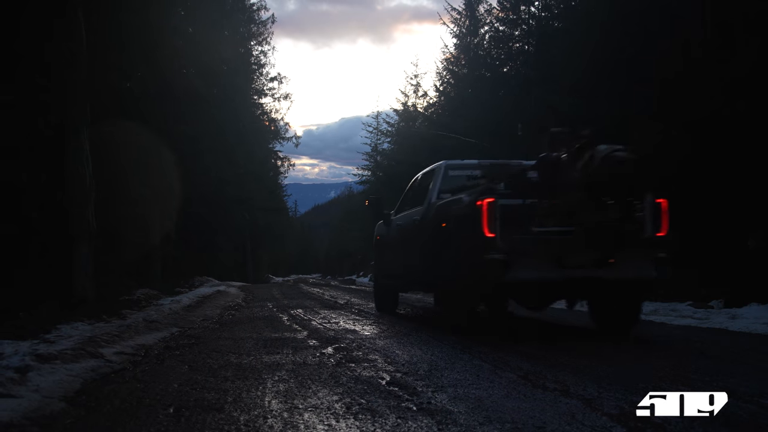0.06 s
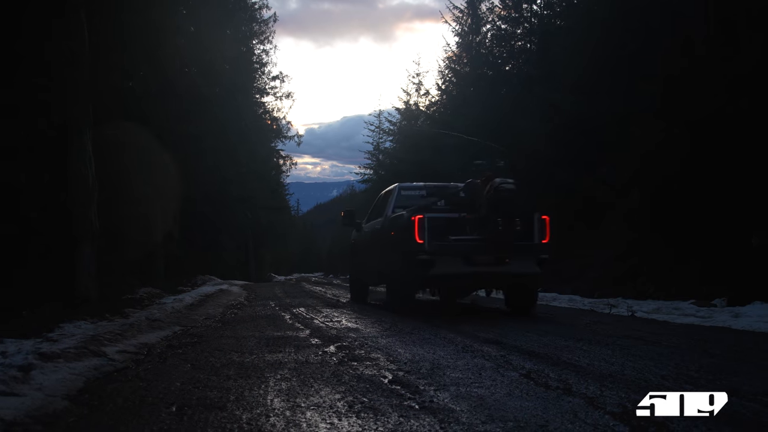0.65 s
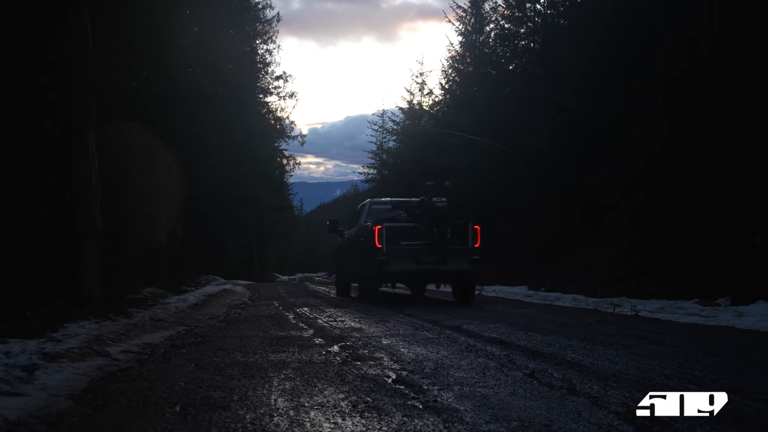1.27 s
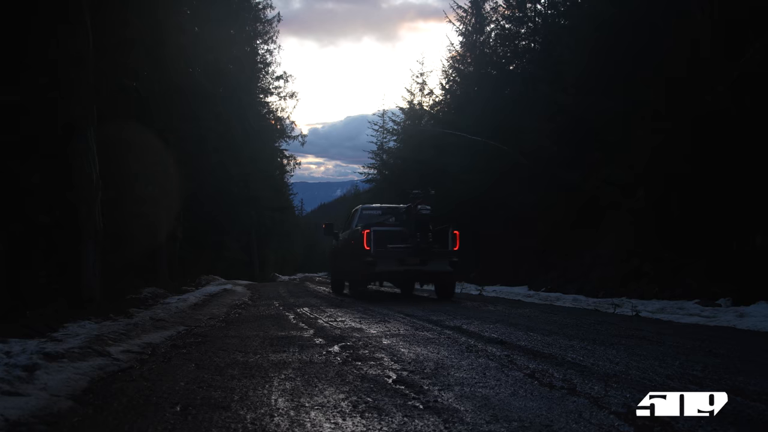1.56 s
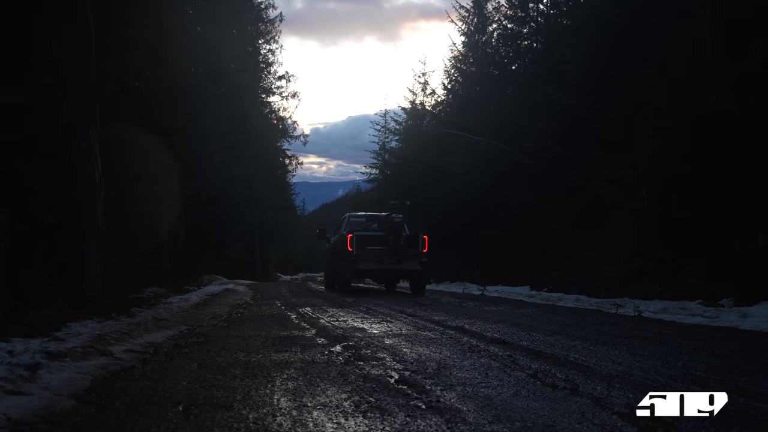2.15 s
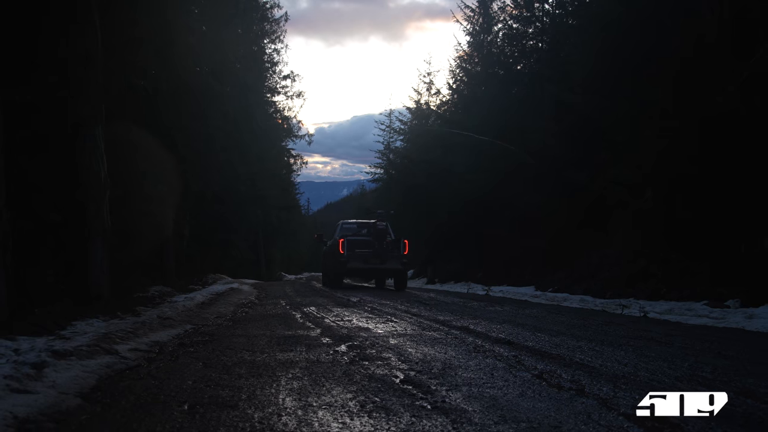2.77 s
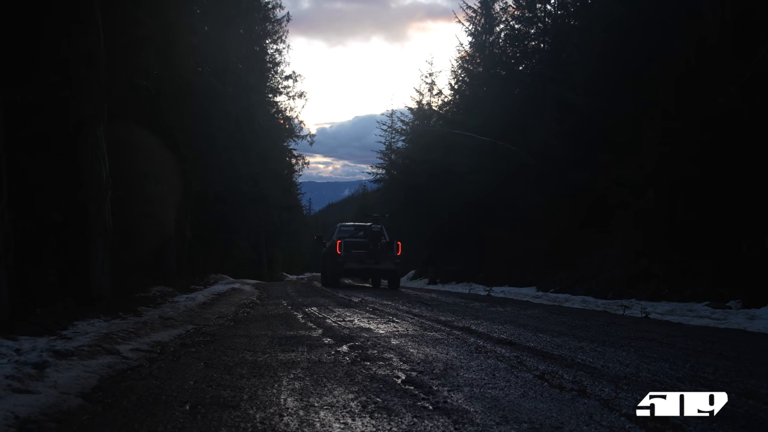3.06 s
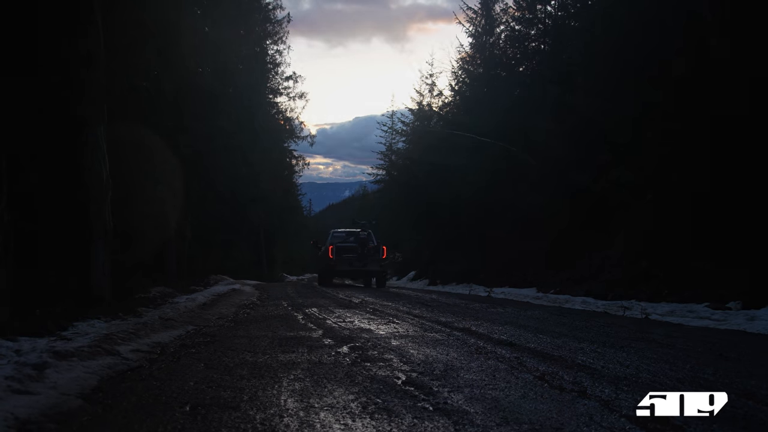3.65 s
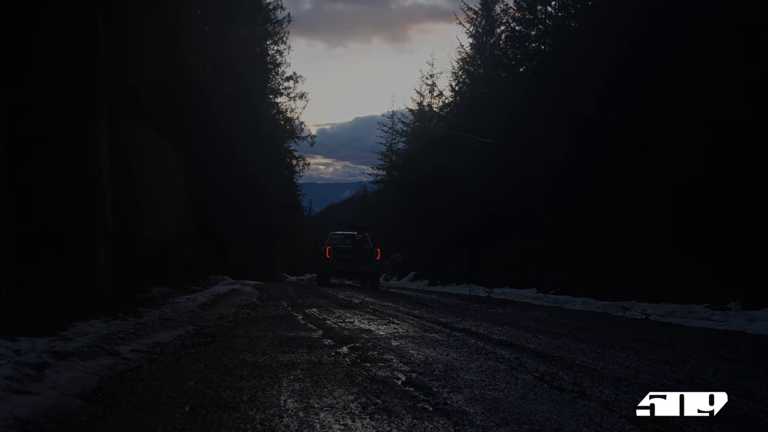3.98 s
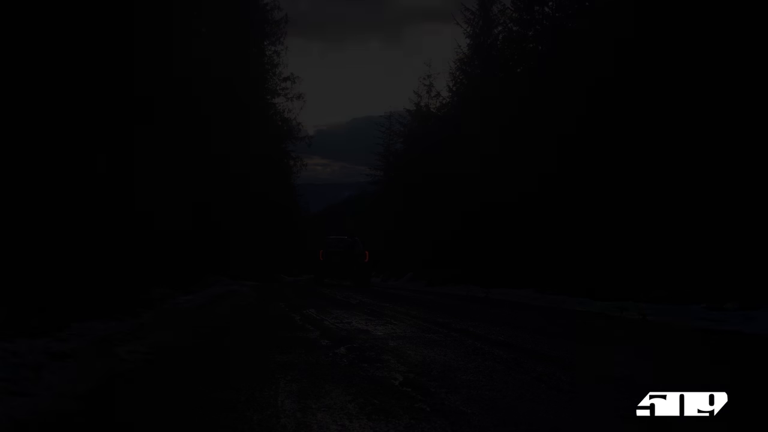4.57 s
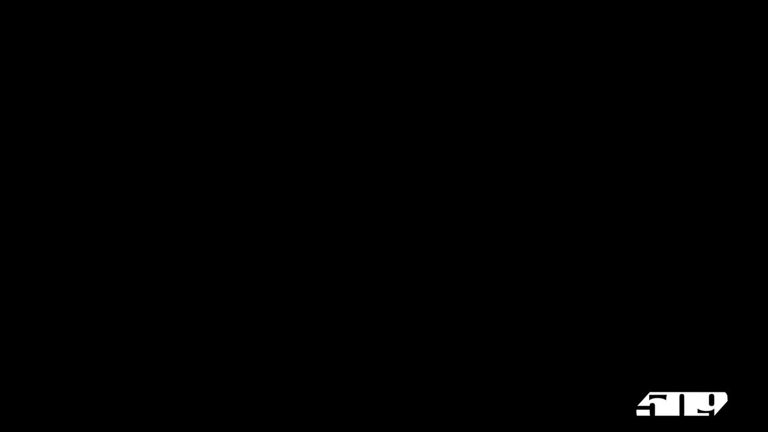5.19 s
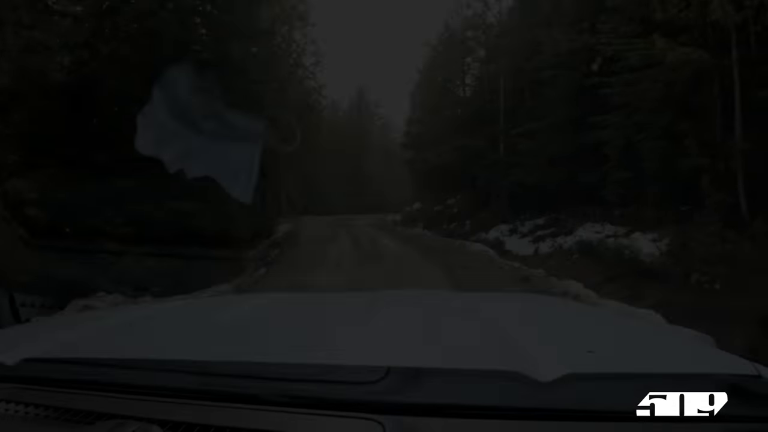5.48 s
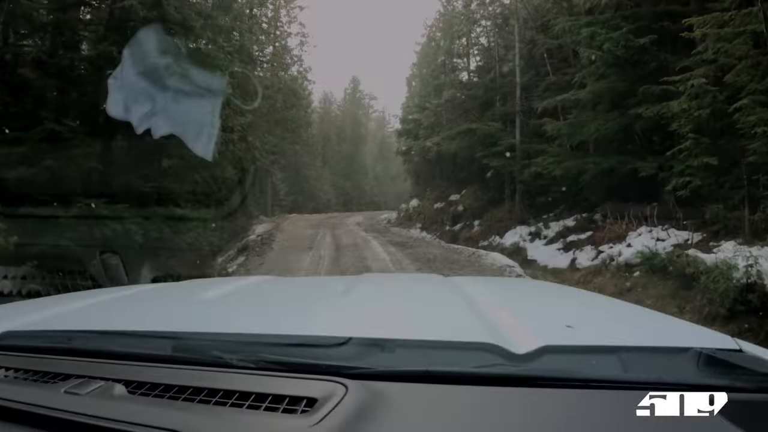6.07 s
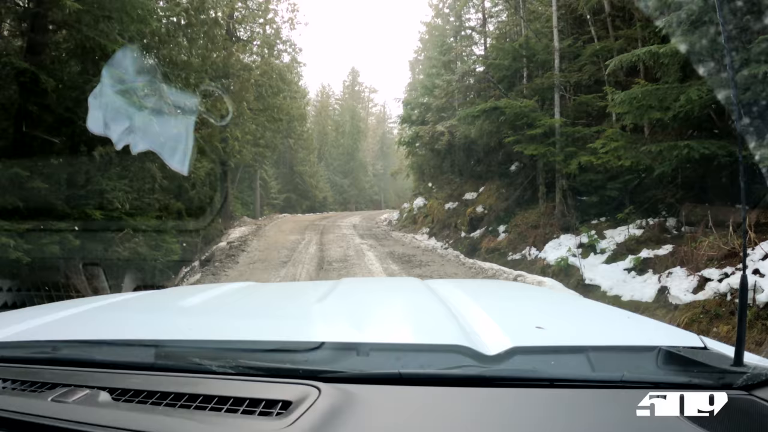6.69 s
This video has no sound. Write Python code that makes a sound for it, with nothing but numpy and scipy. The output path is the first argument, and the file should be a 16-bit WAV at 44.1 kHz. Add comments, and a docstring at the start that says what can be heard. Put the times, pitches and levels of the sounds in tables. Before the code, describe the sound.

Heard from the edge of a wet forest road, truck tyres crackle over grit and fling hissing spray, with snapping stones, a few pothole knocks and a barely audible engine hum. The truck grows distant and everything fades out. After a moment of silence the microphone is inside the moving cab, where a heavy low rumble and repeated bumps dominate, while loose trim chatters softly and gravel hisses under the floor.

```python
"""Pickup on wet gravel

A pickup drives away: its tyres crunch grit, fling spray, pop stones and thump through holes
over a faint exhaust drone. That fades to silence, and the ride fades in from inside the cab:
the body booms, the road rumbles through the suspension, gravel hisses under the floor, trim rattles."""
import sys
import numpy as np
from scipy import signal
from scipy.fft import rfft, irfft, next_fast_len
from scipy.io import wavfile
from scipy.ndimage import map_coordinates

SR = 44100
rng = np.random.default_rng(int(sys.argv[2]) if len(sys.argv) > 2 else 0)


def master(y):
    """Save y as 16-bit WAV."""
    cut = np.clip(np.atleast_2d(y).T, -1, 1)
    pcm = np.round(cut * 32767)  # scale
    wavfile.write(sys.argv[1], SR, pcm.astype(np.int16))


N = 301198
T = np.arange(N) / SR
SIDES = np.array([[.5], [-.5]])  # splits a left-right difference


def amp(db):
    """Decibels to gain."""
    return 10 ** (np.asarray(db) / 20)


def unit(x):
    """Scale to rms 1."""
    return x / np.sqrt(np.mean(x ** 2) + 1e-20)


def along(points, hz):
    """(f/Hz, value) points read on a log axis."""
    freqs, values = np.transpose(points)
    return np.interp(np.log(hz + 1), np.log(freqs), values)


def curves(rows):
    """One value per sample for each column after the time."""
    times, *columns = np.transpose(rows)
    return [np.interp(T, times, column) for column in columns]


def wobble(rate_hz):
    """Smooth random curve, rate_hz knots a second."""
    return map_coordinates(rng.standard_normal(int(N * rate_hz / SR) + 4), [T * rate_hz])


def swell(at_s, half_s):
    """Gaussian rise and fall."""
    return np.exp(-.5 * ((T - at_s) / half_s) ** 2)


def bursts(rows, attack_s, decay_s):
    """Envelope of brief flurries: quick rise, exponential decay."""
    return sum(amp(db) * np.clip((T - s) / attack_s, 0, 1) * np.exp(-np.abs(T - s - attack_s) / decay_s)
               for s, db, *_ in rows)


def filtered(x, response):
    """Apply a frequency response."""
    size = next_fast_len(N + SR // 2)
    return irfft(rfft(x, size) * response(np.fft.rfftfreq(size, 1 / SR)), size)[..., :N]


def coloured(x, spectrum):
    """Minimum-phase filter with 36 dB/octave skirts; output at rms 1."""
    size = 2 * next_fast_len(N)
    hz = np.fft.rfftfreq(size, 1 / SR) + 1
    octaves_out = np.abs(np.log2(hz / np.clip(hz, spectrum[0][0], spectrum[-1][0])))
    db = np.maximum(along(spectrum, hz) - 36 * octaves_out, -120)
    cepstrum = irfft(np.log(amp(db)))
    cepstrum[1:size // 2] *= 2
    cepstrum[size // 2 + 1:] = 0
    return unit(irfft(rfft(x, size) * np.exp(rfft(cepstrum)))[..., :N])


def spread(pair, coherence):
    """Two unrelated signals, as mid and side, to left and right of given coherence."""
    def weights(hz):
        angle = np.arccos(np.clip(along(coherence, hz), -1, 1)) / 2
        return np.array([np.cos(angle), np.sin(angle)])
    mid, side = filtered(pair, weights)
    return np.array([mid + side, mid - side])


def tone(hz):
    """Sine of varying frequency, rms 1."""
    return unit(np.sin(2 * np.pi * np.cumsum(hz) / SR))


def ring(hz, cycles, t):
    """Resonance, 60 dB down after the given cycles."""
    return np.sin(2 * np.pi * hz * t) * np.exp(-np.log(1000) * hz * t / cycles)


def add(track, at_s, sound):
    """Mix a sound into a track."""
    part = track[..., round(at_s * SR):][..., :sound.shape[-1]]
    part += sound[..., :part.shape[-1]]


def grit(rate_hz, scatter_db, wash_db):
    """Two streams of tiny impacts of scattered size on a wash of noise."""
    hits = rng.random((2, N)) < rate_hz / SR
    sizes = amp(scatter_db * np.minimum(rng.standard_normal((2, N)), 2))
    signs = rng.choice([-1, 1], (2, N))
    return unit(unit(hits * sizes * signs) + amp(wash_db) * rng.standard_normal((2, N)))


def clumps(rate_hz, decay_s, share):
    """Clods give way and crumble: overlapping decays as a gain of rms 1."""
    t = np.arange(SR // 10) / SR
    starts = (rng.random(N) < rate_hz / SR) * rng.uniform(0.4, 1, N)
    power = np.abs(signal.fftconvolve(starts, np.exp(-t / decay_s))[:N])
    return np.sqrt(1 - share + share * power / power.mean())


def suspension(rows, cycles):
    """Each bump rings a low body mode; rubber mounts soften the blow."""
    thumps, t = np.zeros(N), np.arange(SR // 3) / SR
    for s, db, hz in rows:
        onset = 1 - np.exp(-(hz * t) ** 2)
        add(thumps, s, amp(db) * ring(hz, cycles, t) * onset)
    return thumps


START_M, SPEED_M_PER_S = 10.17, 5.04
TRAVEL_M = SPEED_M_PER_S * T
DISTANCE_DOUBLINGS = np.log2(1 + TRAVEL_M / START_M)

# firing note: t/s, f/Hz, level/dB
FIRING_NOTE = [(0, 86, -49.5), (1, 86, -57), (1.9, 104, -61), (2.7, 92, -61), (3.5, 88, -57.5),
               (4.0, 88, -53.5), (4.4, 89.2, -63)]


def exhaust():
    """Faint, unsteady tailpipe drone."""
    firing_hz, db = curves(FIRING_NOTE)
    return amp(db + 1.8 * wobble(6.7)) * tone(firing_hz + 1.54 * wobble(15))


# flurries of trim and of grit: t/s, level/dB
TRIM_BURSTS = [(5.436, -46), (5.496, -44), (5.561, -45.5), (5.62, -48), (5.676, -50), (5.738, -48.5),
               (5.903, -52), (6.007, -53), (6.123, -50), (6.158, -48), (6.186, -45), (6.228, -52),
               (6.346, -51), (6.668, -53), (6.742, -52)]
SPATTER_BURSTS = [(5.743, -57), (5.78, -59), (5.986, -55), (6.027, -57), (6.221, -54), (6.29, -57),
                  (6.475, -56), (6.627, -55), (6.707, -56), (6.79, -51)]
# their spectra: f/Hz, level/dB
TRIM_SPECTRUM = [(1000, 1), (1300, 3), (1700, -1), (2250, -3), (2900, -9.5), (3700, -17.5), (5500, -27)]
SPATTER_SPECTRUM = [(2000, -1), (4000, 4.5), (7000, -6.5), (12000, -17)]


def rattles():
    """Loose trim chatters; flung grit spatters brightly against the body."""
    chatter = coloured(grit(rate_hz=810, scatter_db=8.5, wash_db=-2), TRIM_SPECTRUM)
    spatter = coloured(grit(rate_hz=1500, scatter_db=5, wash_db=-5.5), SPATTER_SPECTRUM)
    return (chatter * bursts(TRIM_BURSTS, attack_s=.005, decay_s=.014)
            + spatter * bursts(SPATTER_BURSTS, attack_s=.004, decay_s=.01))


# body heaves: t/s, level/dB
BODY_HEAVES = [(5.39, -20), (5.52, -27.5), (5.79, -21.5), (5.91, -19.5), (5.951, -14.5), (6.08, -20),
               (6.21, -16.5), (6.28, -14.5), (6.42, -18.5), (6.53, -18), (6.61, -18.5), (6.71, -12),
               (6.81, -10.5)]


def boom(mode_hz=33.1, drift_hz=4.23):
    """Each heave swells the cab's lowest air resonance."""
    power = sum((amp(db) * swell(s, half_s=0.047)) ** 2 for s, db in BODY_HEAVES)
    return np.sqrt(power) * tone(mode_hz + drift_hz * wobble(11))


# rough stretches: t/s, half-length/s, shake/dB, grit/dB
ROUGH_STRETCHES = [(5.397, .025, 0, 2), (5.456, 0.027, 4, 2), (5.597, 0.057, 3.5, -3.5),
                   (5.76, 0.024, 0, -1.5), (5.932, 0.03, -0.5, 1), (6.153, 0.044, 2.5, 4),
                   (6.3, 0.03, 1, 4), (6.426, 0.066, 0, -1), (6.668, 0.096, -2, 0.5), (6.77, 0.022, 3.5, 4),
                   (6.822, 0.024, 0, 10)]
# spectra in the cab: f/Hz, level/dB
RUMBLE_SPECTRUM = [(18, -2), (32, -9.5), (45, -4.5), (57, 0), (72, -9.5), (86, -12.5), (100, -8.5),
                   (128, -13), (175, -16), (210, -23.5)]
ROAR_SPECTRUM = [(170, -15.5), (220, -4), (285, 0), (345, -13.5), (395, -6), (460, -16), (560, -13),
                 (720, -21), (1000, -23), (1250, -32)]
GRAVEL_SPECTRUM = [(1000, -14.5), (1400, -3.5), (2050, -6.5), (2700, -8.5), (4000, -12), (5200, -16.5),
                   (7000, -21.5), (10000, -30), (15000, -38)]


def road_noise():
    """The road shakes the cab's air; gravel hisses faintly through the floor."""
    shake_db, grit_db = sum(np.outer(dbs, swell(s, half_s)) for s, half_s, *dbs in ROUGH_STRETCHES)
    rumble = amp(-20.5 + shake_db) * coloured(rng.standard_normal((2, N)), RUMBLE_SPECTRUM)
    roar_gain = amp(-36.5 + 1.3 * shake_db + wobble(30))
    roar = coloured(grit(rate_hz=550, scatter_db=2, wash_db=2.5), ROAR_SPECTRUM)
    gravel_gain = amp(-58.5 + grit_db) * clumps(rate_hz=110, decay_s=0.013, share=0.62)
    gravel = coloured(grit(rate_hz=540, scatter_db=1.5, wash_db=6.5), GRAVEL_SPECTRUM)
    return rumble + roar_gain * roar + gravel_gain * gravel


# bumps through the suspension: t/s, level/dB, f/Hz
CAB_BUMPS = [(5.47, -18, 90), (5.598, -17, 110), (5.62, -16, 62), (5.744, -21, 225), (5.775, -18, 105),
             (5.847, -24, 255), (6.028, -12, 155), (6.035, -13, 64), (6.11, -9, 70), (6.152, -8.5, 108),
             (6.156, -20, 280), (6.16, -26, 480), (6.29, -27, 520), (6.362, -11.5, 130), (6.39, -13.5, 62),
             (6.466, -26, 570), (6.496, -23, 230), (6.61, -15, 57), (6.744, -7.5, 64), (6.777, -26, 290)]
# left-right likeness: f/Hz, coherence
CAB_COHERENCE = [(60, 1.0), (130, 1), (290, 0.97), (640, 0.94), (1410, 0.8), (3100, 0.6), (6820, 0.13),
                 (15000, 0.15)]


def cab():
    """The ride from inside, slightly louder on the left."""
    diffuse = spread(road_noise() + rattles(), CAB_COHERENCE)
    return (diffuse + boom() + suspension(CAB_BUMPS, cycles=21.6)) * amp(1.3 * SIDES)


# wheel drops: t/s, level/dB, f/Hz
POTHOLES = [(1.094, -21, 310), (1.116, -20, 170), (1.133, -22, 105), (1.47, -28, 290), (1.9, -26, 170),
            (2.378, -28, 140), (2.403, -26.5, 200), (3.245, -31, 260), (3.77, -34, 330), (3.985, -32, 230),
            (4.435, -29, 250), (4.59, -30, 280)]
# knock and rolling spectra: f/Hz, level/dB
AXLE_SPECTRUM = [(35, -7), (150, -7), (280, 0), (480, -1), (620, -11)]
ROLL_SPECTRUM = [(30, -31.5), (50, -7), (68, -6.5), (100, -1), (165, -2.5), (188, -6.5), (220, -1),
                 (290, -4), (360, -6.5), (520, -7.5), (750, -18)]


def chassis():
    """Rolling rumble, less on smoother ground; in holes the body thumps and the axle knocks."""
    smooth_ground = np.clip((T - 2.15) / 0.3, 0, 1)
    roll_db = -39 - 2 * DISTANCE_DOUBLINGS - 5.5 * smooth_ground + 1.4 * wobble(25)
    knock_gain = amp(-15.5) * bursts(POTHOLES, attack_s=.008, decay_s=.028)
    knocks = knock_gain * coloured(rng.standard_normal(N), AXLE_SPECTRUM)
    roll = amp(roll_db) * coloured(rng.standard_normal(N), ROLL_SPECTRUM)
    return roll + suspension(POTHOLES, cycles=13) + knocks


# stone pops: t/s, relative level/dB, f/Hz
STONE_POPS = [(0.226, -17, 1130), (0.256, -14, 1000), (0.304, -17, 1140), (0.435, -10, 1230),
              (0.506, -15, 1680), (0.551, -17, 1060), (0.624, -17, 2300), (0.692, -18, 1530),
              (0.9, -18, 900), (0.954, -17, 3700), (0.961, -14.5, 2100), (0.975, -14, 888),
              (1.0, -12, 2200), (1.228, -15, 1030), (1.294, -16, 1630), (1.596, -19, 1140),
              (1.702, -15, 1170), (1.958, -19, 1270), (2.233, -17, 2120), (2.283, -19, 1020),
              (2.364, -20, 2340), (2.52, -21, 1100), (2.691, -19, 1060), (2.848, -21, 800),
              (3.197, -16, 1540), (3.25, -22, 1280), (3.329, -23, 1020), (3.405, -22, 899),
              (3.574, -22, 2160), (3.815, -24, 1750), (4.059, -18.5, 1210), (4.133, -24, 2250),
              (4.174, -24, 2100), (4.264, -25, 1100), (4.377, -24, 1100)]


def stones(gain_db=4.5, cycles=7, debris_t60_s=.032, low_hz=680, high_hz=5000):
    """Stones snap from under the tread, ring, rebound and trail a wide patter of debris."""
    pops, t = np.zeros((2, N)), np.arange(SR // 8) / SR
    mid = pops[0]
    for s, db, hz in STONE_POPS:
        debris = amp(db - 15 - 60 * t / debris_t60_s) * rng.standard_normal((2, len(t)))
        add(pops, s, debris)
        add(mid, s, amp(db) * ring(hz, cycles, t))
        rebound_s = s + rng.uniform(0.0016, 0.003)
        add(mid, rebound_s, amp(db - 9) * ring(hz * rng.uniform(1, 2.8), cycles, t))
    pops *= amp(gain_db)
    return filtered(pops, lambda hz: 1 / (1 + (hz / high_hz) ** 4) / (1 + (low_hz / (hz + 1)) ** 6))


# water on the road: t/s, level/dB
ROAD_WETNESS = [(0, -2.1), (.9, 1.3), (1.6, -1.5), (2.2, -0.75), (2.9, 1.7), (3.7, -0.5), (4.5, -2)]
# droplet spectrum: f/Hz, level/dB
SPRAY_SPECTRUM = [(2200, -15.5), (2800, 6), (3350, -0.5), (3950, 3), (4900, 0), (5300, -5), (5800, 0.5),
                  (6400, -12.5), (7300, -9.5), (8400, -6), (10500, -16), (12500, -16), (15800, -22.5)]


def spray(ground_db, mist_hz=10000, mist_loss_db_per_m=0.38):
    """Droplets flung by the tread; the finest mist is lost first with distance."""
    drops = coloured(grit(rate_hz=1300, scatter_db=4.5, wash_db=2.5), SPRAY_SPECTRUM)
    mist = filtered(drops, lambda hz: 1 / (1 + (mist_hz / (hz + 1)) ** 8))
    mist_gain = amp(2 - mist_loss_db_per_m * TRAVEL_M)
    level_db = -32.5 - 8 * DISTANCE_DOUBLINGS + curves(ROAD_WETNESS)[0] + .55 * ground_db
    return (drops + (mist_gain - 1) * mist) * amp(level_db)


# loose (+) and bare (-) ground: t/s, half-length/s, level/dB
GROUND_PATCHES = [(0, 0.019, 3.5), (0.126, 0.011, -4), (0.255, 0.0071, 3), (0.304, 0.012, -2.5),
                  (0.377, 0.023, 2), (0.44, 0.016, 3), (.51, 0.024, 1.5), (0.644, 0.032, -1.5),
                  (0.8, 0.015, 2.5), (0.849, 0.02, -3), (0.98, 0.012, -3), (1.027, 0.01, -3),
                  (1.222, 0.013, 4.5), (1.295, 0.015, 3.5), (1.38, 0.0083, -4), (1.558, 0.13, 1.5),
                  (1.884, .008, -5), (2.055, 0.01, 4.5), (2.303, 0.029, 3), (2.528, 0.016, 2),
                  (2.556, 0.007, -3.5), (2.843, 0.0072, 5), (3.165, 0.023, 4), (3.182, 0.0092, -11),
                  (3.316, 0.005, -6.5), (3.765, 0.012, 5), (4.2, 0.23, -1.5), (4.314, 0.016, 4.5)]
# crushed grit spectrum, close-range colour: f/Hz, level/dB
CRUNCH_SPECTRUM = [(400, -17.5), (560, -7.5), (720, -7), (900, -0.5), (1150, 0), (1450, -1.5), (1830, -3),
                   (2180, .5), (2650, -12), (3300, -22)]
NEAR_EQ = [(900, -0.5), (1270, 0), (1400, -5), (1750, 3), (2200, -2.5), (3350, 3), (4300, 0.5), (5300, 2.5),
           (5850, -3), (7000, 5.5), (8400, -1.5), (12000, 2.5)]


def tyres(near_s=1.4):
    """Tread crushes wet grit in clumps that also throw spray; the colour shifts as the truck leaves."""
    ground_db = sum(db * swell(s, half_s) for s, half_s, db in GROUND_PATCHES)
    crumble = clumps(rate_hz=150, decay_s=0.0072, share=0.38)
    grains = grit(rate_hz=900, scatter_db=3.2, wash_db=-4)
    crunch = coloured(grains, CRUNCH_SPECTRUM) * amp(-26 - 6 * DISTANCE_DOUBLINGS + ground_db)
    tread = (crunch + spray(ground_db)) * crumble
    near = np.exp(-(T / near_s) ** 2)
    return (1 - near) * tread + near * filtered(tread, lambda hz: amp(along(NEAR_EQ, hz)))


# left-right balance: f/Hz, left minus right/dB
ROADSIDE_BALANCE = [(480, -4.5), (700, -0.5), (900, 2), (1350, 1.5), (1600, -4.5), (1850, -10.5),
                    (2550, -4.5), (3000, 0.5), (4300, -1.5), (5750, 6.5), (7000, -4), (8300, -1.5),
                    (10300, -8), (13500, 1)]
# left-right phase: f/Hz, left lead/rad
ROADSIDE_PHASE = [(850, 0), (1200, .45), (1450, 1.15), (1800, .8), (2000, 0), (2400, -.1), (2650, -1.5),
                  (3500, -.1), (7000, -.3), (15000, -.7)]


def stereo_response(hz):
    """Left and right response outdoors, at constant summed power."""
    gains = amp(SIDES * along(ROADSIDE_BALANCE, hz))
    gains /= np.sqrt(np.mean(gains ** 2, axis=0))
    return gains * np.exp(1j * SIDES * along(ROADSIDE_PHASE, hz))


# left-right likeness: f/Hz, coherence
ROADSIDE_COHERENCE = [(250, 1), (900, .97), (1250, .88), (1450, .72), (2200, .78), (2650, .5), (3900, .72),
                      (5700, .68), (6300, .25), (8200, .46), (12000, .25)]


def roadside():
    """The tyres move from the right toward the middle; long waves reach both sides alike."""
    wheels = filtered(spread(tyres() + stones(), ROADSIDE_COHERENCE), stereo_response)
    pan_db = -2.2 * np.exp(-T / .7) + 0.15 * T
    return wheels * amp(SIDES * pan_db) + chassis() + exhaust()


def scene():
    """Roadside, silence, then the cab."""
    fade_out = np.interp(T, (4.2, 4.791), [1, 0]) ** 0.9
    fade_in = np.interp(T, (5.345, 5.78), [0, 1]) ** 1.03
    return roadside() * fade_out + cab() * fade_in


def record(dry):
    """Short closing fade and band limit."""
    fade_s, top_hz = .008, 15800
    fade = np.sin(np.pi / 2 * np.clip((T[-1] - T) / fade_s, 0, 1)) ** 2
    return filtered(dry * fade, lambda hz: hz < top_hz)


dry = scene()
out = record(dry)
master(out)
```